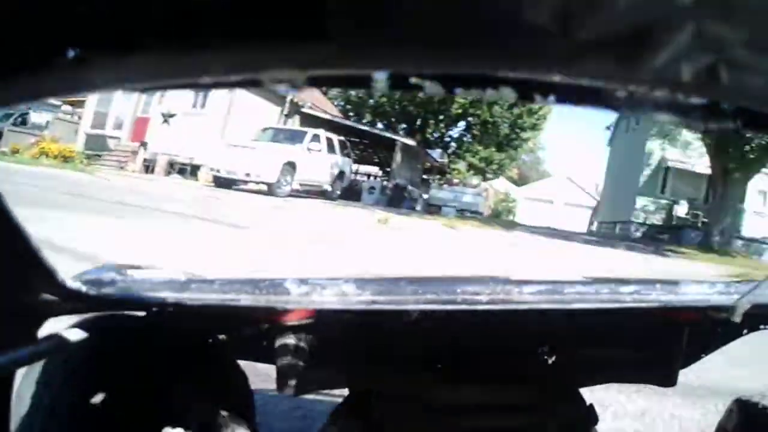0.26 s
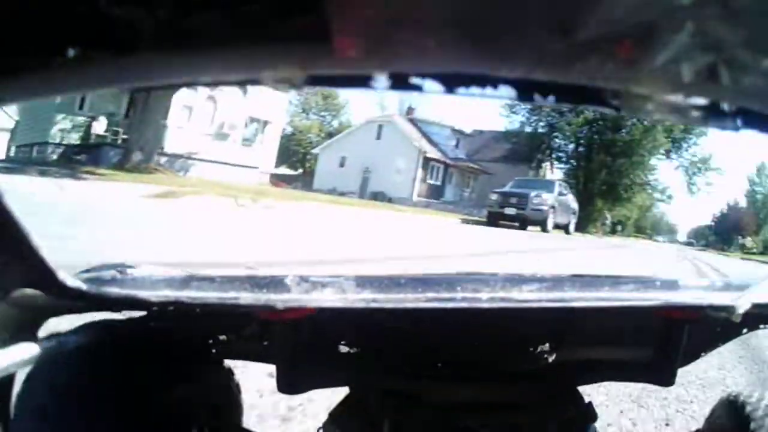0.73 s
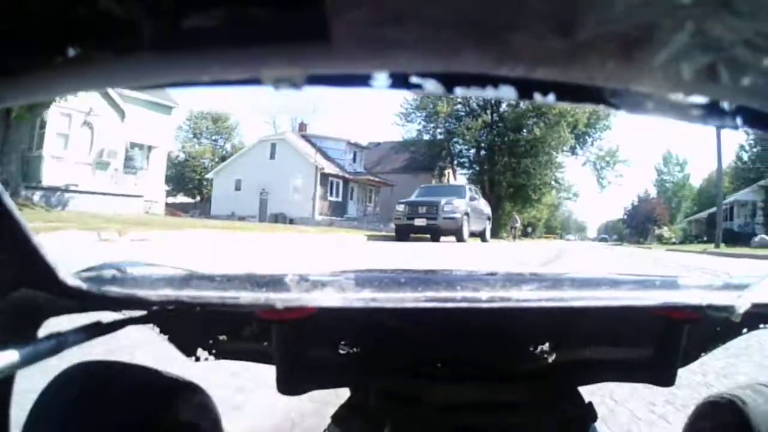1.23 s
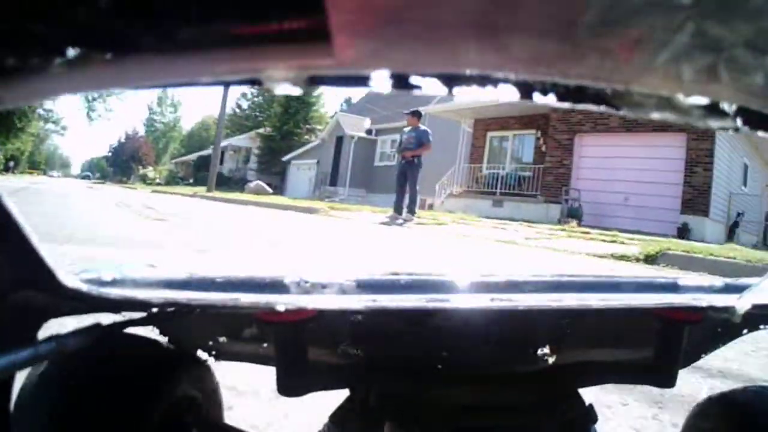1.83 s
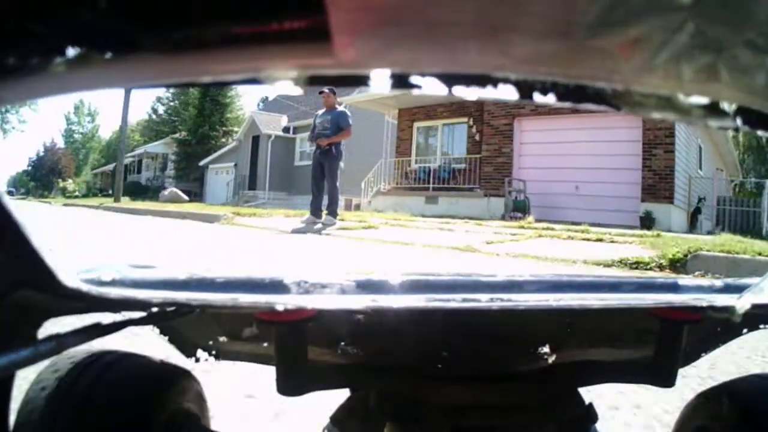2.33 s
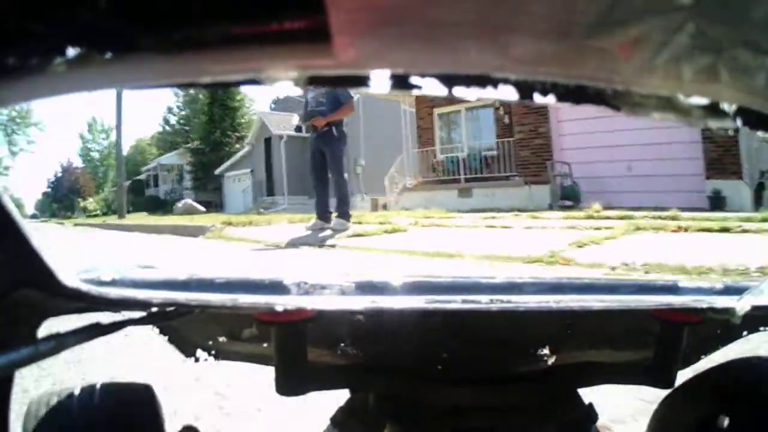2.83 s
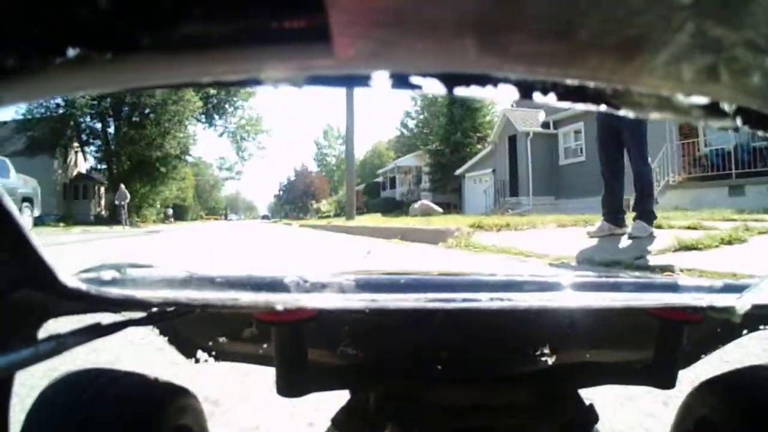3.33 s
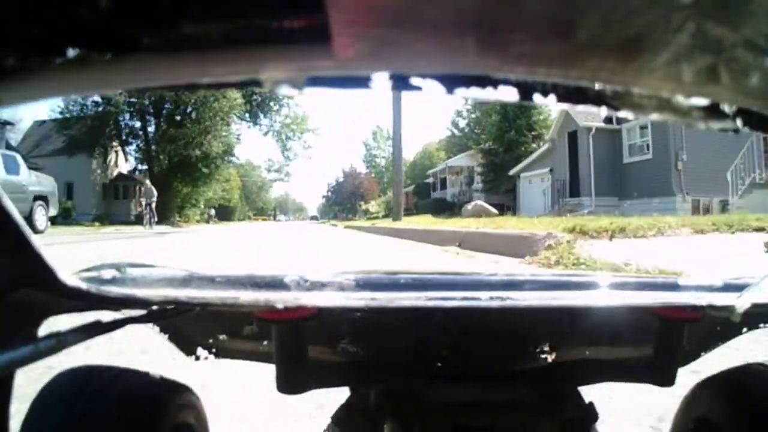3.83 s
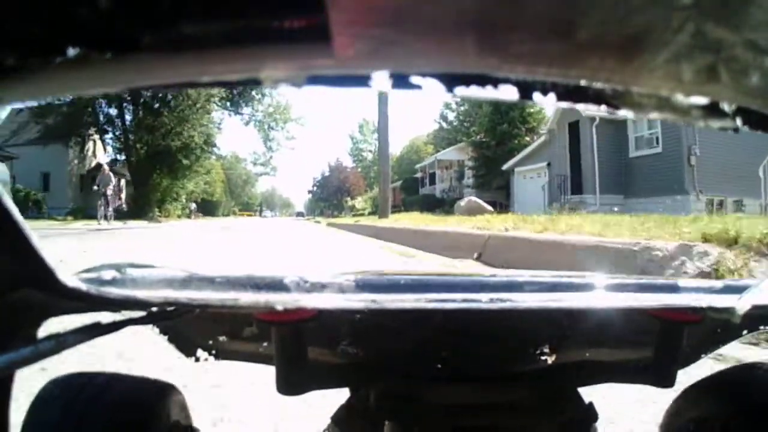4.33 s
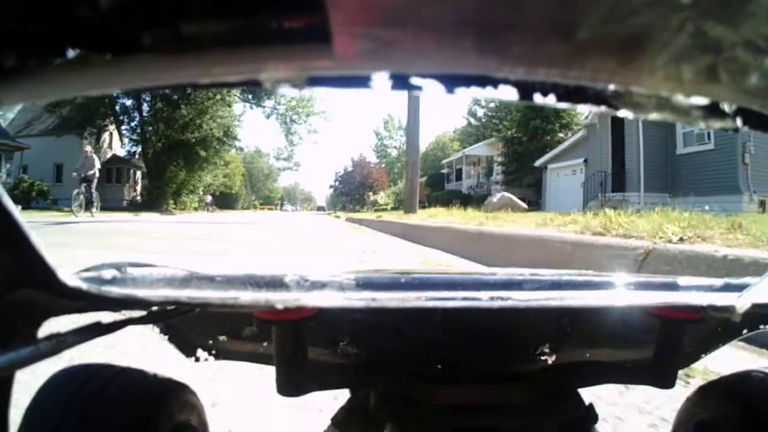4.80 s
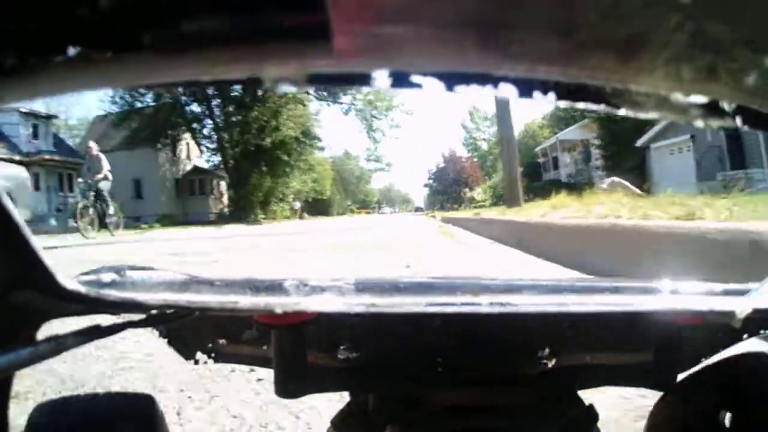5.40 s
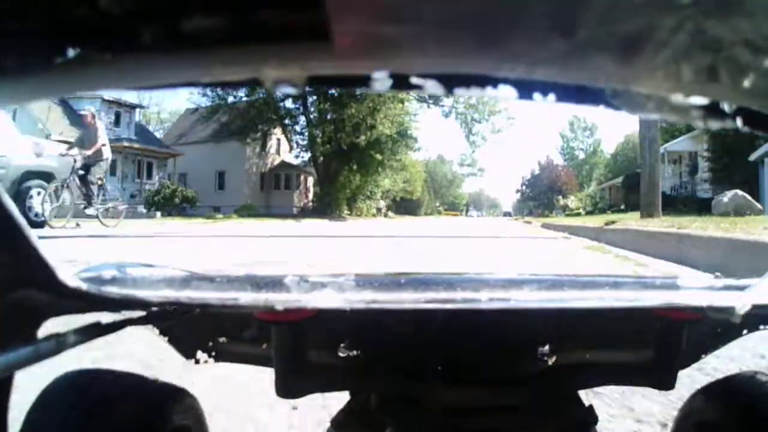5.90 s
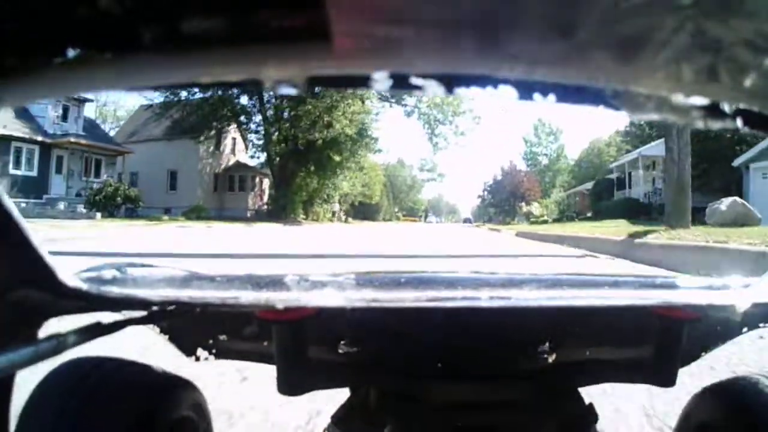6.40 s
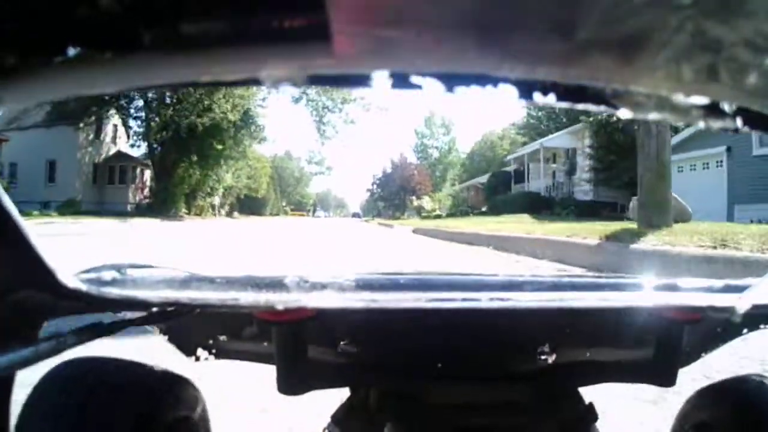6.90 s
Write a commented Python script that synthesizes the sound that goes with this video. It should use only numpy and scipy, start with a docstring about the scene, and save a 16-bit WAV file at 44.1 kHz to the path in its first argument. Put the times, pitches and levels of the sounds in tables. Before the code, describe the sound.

Heard from inside the plastic shell of a small electric model truck: gears grind and knocks rattle, then tyre lugs clatter rapidly in a sharp turn. The whine judders in and climbs fast, a second short rattle follows, the gears stutter off power, then settle into a steady gritty whine on the street, with a few bumps and faint squeaks.

```python
"""The gears of a small electric model truck, heard from a camera inside its plastic shell. The pinion whines on
a 54-tooth spur gear as a swept sine and its octave; noise shaped by the worn teeth repeats in part with every
turn, and the gearbox adds a lower, fuzzy moan. In sharp turns the tyre lugs rattle on the shell as ringing
modes and the floor pan hums; jolts from gear slack and from bumps in the street shake the loose shell above a
filtered-noise road rumble, with a few thin squeaks."""
import sys
import numpy as np
from scipy import signal
from scipy.fft import rfft, irfft
from scipy.io import wavfile

SR = 44100
rng = np.random.default_rng(int(sys.argv[2]) if len(sys.argv) > 2 else 0)


def transcribe(signal):
    """Save signal, clipped to [-1, 1], as a 16-bit WAV file at the path in sys.argv[1]."""
    frames = np.atleast_2d(signal).T
    limited = np.clip(frames, -1, 1)
    pcm = np.round(limited * 32767).astype(np.int16)
    wavfile.write(sys.argv[1], SR, pcm)


N = 315315

# ringing modes of the plastic shell: (f/Hz, width/Hz, relative level/dB)
SHELL_MODES = [(850, 67, -15.5), (961, 37, -13), (1458, 56, -11), (1850, 250, -2.5), (2447, 78, -5.5),
               (2900, 224, 2), (3166, 350, 2.5), (3850, 360, -4), (4670, 240, -11), (4920, 180, -12),
               (5510, 180, -16)]


def gain_of(db):
    """Decibels to a factor."""
    return 10 ** (np.asarray(db) / 20)


def evened(x):
    """Scales to rms 1."""
    return x / np.sqrt(np.mean(x ** 2) + 1e-20)


def curves(rows):
    """Every column of a table after its times, drawn as a line through the points."""
    s, *columns = np.transpose(rows)
    t = np.arange(N) / SR
    return [np.interp(t, s, column) for column in columns]


def coloured(x, points):
    """Imposes a spectrum, almost silent outside its ends, and scales to rms 1."""
    hz, db = np.transpose(points)
    f = np.fft.rfftfreq(N, 1 / SR)
    # straight lines in dB over log frequency
    spectrum_db = np.interp(np.log(f + 1), np.log(hz + 1), db, -90, -90)
    return evened(irfft(rfft(x) * gain_of(spectrum_db), N))


def ring(modes):
    """Impulse response of decaying modes of alternate sign, peak 1; wider modes die sooner."""
    t = np.arange(SR // 8) / SR
    out = np.zeros(len(t))
    for k, (hz, width, db) in enumerate(modes):
        decay = np.exp(-np.pi * width * t)
        out += (-1) ** k * gain_of(db) * decay * np.sin(2 * np.pi * hz * t)
    return out / abs(out).max()


def slow(hz):
    """Random wander of rms 1, up to about hz."""
    b, a = signal.butter(2, hz, fs=SR)
    return evened(signal.lfilter(b, a, rng.standard_normal(N)))


def add(mix, s, sound):
    """Mixes a sound in at s seconds."""
    part = mix[round(s * SR):][:len(sound)]
    part += sound[:len(part)]


def spell(start, end, edge_s):
    """A gate from 0 to 1 and back, with soft edges."""
    t = np.arange(N) / SR
    return np.clip(np.minimum(t - start, end - t) / edge_s, 0, 1)


def drive_line():
    """Meshing rate with the twist around each bump, torque, turns of the heavy spur gear, and shaking."""
    # speed of the drive line: (t/s, tooth meshing f/Hz, torque on the teeth as whine level/dB)
    speed = [(0.62, 731, -56), (0.65, 737, -19), (0.715, 810, -16.5), (0.74, 864, -28.5),
             (0.775, 878, -15.5), (0.8, 978, -25), (0.89, 1236, -19), (1.05, 1577, -23.5),
             (1.15, 1745, -20), (1.25, 1911, -24), (1.31, 1872, -20), (1.35, 1740, -32), (1.45, 1592, -40),
             (1.86, 1332, -44), (1.9, 1240, -38), (2.04, 1251, -28), (2.72, 1310, -29.5),
             (2.84, 1258, -26.5), (3.1, 1237, -27.5), (4.2, 1272, -28.5), (5.15, 1320, -26.5),
             (5.45, 1293, -26.5), (5.82, 1252, -27.5), (6.0, 1288, -28), (7.15, 1351, -25)]
    # a wheel takes a crack and the drive line rings in twist: (t/s of deepest sag, depth/Hz, dying time/s)
    bumps = [(2.781, 99.94, 0.11), (3.17, 35, .04), (5.283, 109, 0.16), (6.465, 40.06, .04)]
    teeth, twist_hz, twist_rise_s, full_bump_hz = 54, 16.07, 0.025, 100
    hz, torque_db = curves(speed)
    turns = np.cumsum(hz) / SR / teeth  # the heavy gear ignores the twist
    t = np.arange(N) / SR
    twist, shaken = np.zeros(N), np.zeros(N)
    for s, depth_hz, dying_s in bumps:
        shake = depth_hz * np.exp(-np.maximum((t - s) / dying_s, (s - t) / twist_rise_s))
        twist += shake * np.cos(2 * np.pi * twist_hz * (t - s))
        shaken += shake / full_bump_hz
    return hz - twist, torque_db, turns, shaken


def surging():
    """Rise in dB of the gear noise as the gears, off the throttle, knock through their slack."""
    # surges: (start t/s, length/s, rise/dB)
    surges = [(0.04, 0.045, 5.5), (1.487, 0.092, 6), (1.598, 0.057, 7.5), (1.664, .03, 4),
              (1.716, 0.033, 7), (1.793, 0.034, 9)]
    edge_s = 0.0027
    return sum(db * spell(s, s + length, edge_s) for s, length, db in surges)


def off_centre(turns):
    """The spur gear runs a little off centre: a swing from -1 to 1 once a turn."""
    return np.cos(2 * np.pi * (turns - 0.25))


def rubbing(column):
    """One dB column of the tyre rubs as gains and gates: hardest once, easing towards both ends."""
    # tyres rub: (start t/s, hardest t/s, end t/s, low pan mode level/dB, high pan mode level/dB,
    #             lug thud level/dB, rumble rise/dB); the levels hold at the hardest moment
    rubs = [(0.0, .1, 0.196, -27.5, -31, -40, -10), (0.21, .46, .7, -29.5, -24.5, -24, 18),
            (1.284, 1.452, 1.47, -45, -22.5, -32.5, -7)]
    start_db, end_db, edge_s = -4, -8, 0.0064  # easing at either end, length of the gate's edges
    t = np.arange(N) / SR
    spells = []
    for row in rubs:
        start, hardest, end = row[:3]
        easing_db = np.interp(t, [start, hardest, end], [start_db, 0, end_db])
        spells.append((gain_of(row[column] + easing_db), spell(start, end, edge_s)))
    return spells


def road():
    """Tyres rolling on rough asphalt, felt through the chassis: low noise that shifts with rubs and bumps."""
    # base level of the rumble: (t/s, level/dB)
    road_level = [(0.0, -45), (0.9, -48.5), (1.1, -45), (1.4, -43), (2.0, -47.5), (2.7, -43), (3.3, -45),
                  (4.3, -44), (5.8, -45), (7.15, -47)]
    # colour of the rumble: (f/Hz, relative level/dB)
    rumble_colour = [(12, -46.5), (20, -9), (54, -4.5), (177, -5.5), (206, -2.5), (236, -6.5), (297, 0.5),
                     (436, -9.5), (466, -15.5), (520, -9), (680, -32.5), (1140, -120)]
    bump_rise_db = 3  # at the deepest sag of a full bump
    rub = np.ones(N)
    for gain, gate in rubbing(column=6):
        rub *= gain ** gate  # the gate fades the change in dB
    _, _, _, shaken = drive_line()
    level_db = curves(road_level)[0] + bump_rise_db * shaken + 1.3 * slow(23.0)
    return rub * gain_of(level_db) * coloured(rng.standard_normal(N), rumble_colour)


def squeaks():
    """Brief thin tones, each swelling and fading while its pitch follows an arc."""
    # squeaks: (t/s, length/s, start f/Hz, middle f/Hz, end f/Hz, rms level at the fullest/dB)
    squeak_list = [(2.652, 0.099, 2900, 3287, 3050, -46), (2.965, 0.024, 3858, 3850, 3600, -33),
                   (5.19, 0.06, 3100, 3200, 2750, -50)]
    out = np.zeros(N)
    for s, length, start_hz, middle_hz, end_hz, db in squeak_list:
        u = np.linspace(0, 1, round(length * SR))
        arc = np.polyfit([0, 0.5, 1], [start_hz, middle_hz, end_hz], 2)
        phase = 2 * np.pi * np.cumsum(np.polyval(arc, u)) / SR
        add(out, s, gain_of(db) * np.sqrt(2) * np.sin(np.pi * u) * np.sin(phase))
    return out


def floor_pan(steady=0.27):
    """Rubbing noise keeps two modes of the floor pan humming, more evenly than chance alone."""
    # modes of the floor pan: (f/Hz, width/Hz)
    pan_modes = [(235, 8.1), (452, 28)]
    out = np.zeros(N)
    for (hz, width), spells in zip(pan_modes, [rubbing(column=3), rubbing(column=4)]):
        mode = ring([(hz, width, 0)])
        hum = evened(signal.fftconvolve(rng.standard_normal(N), mode)[:N])
        envelope = abs(signal.hilbert(hum))
        hum = evened(hum / (envelope + 0.2) ** steady)
        out += sum(gain * gate for gain, gate in spells) * hum
    return out


def jolts():
    """A jolt from the gears knocking through their slack, or from a bump, shakes the loose shell for a moment:
    a clump of tiny knocks rings its modes."""
    # jolts: (t/s, peak level/dB, dying time of the shaking/s)
    jolt_list = [(0.038, -15.5, 0.013), (0.103, -19, 0.022), (0.175, -32, 0.033), (1.489, -20, 0.016),
                 (1.53, -43, 0.03), (1.6262, -50, 0.03), (1.664, -32, 0.03), (1.7205, -34, 0.03),
                 (1.7985, -30, 0.017), (1.8421, -34, 0.034), (1.879, -39, 0.028), (2.802, -35, 0.026),
                 (2.98, -27, 0.02), (5.1755, -24, 0.024), (5.305, -32, 0.023), (5.4267, -28, 0.021)]
    out, shell = np.zeros(N), ring(SHELL_MODES)
    t = np.arange(4000) / SR
    for s, db, length in jolt_list:
        knocks = rng.standard_normal(len(t)) ** 3  # cubing leaves sparse, spiky knocks
        shake = signal.fftconvolve(knocks * np.exp(-(t / length) ** 2), shell)
        add(out, s, gain_of(db) * shake / abs(shake).max())
    return out


def lugs(scrape_s=0.0056, rise_s=0.0013, rebound_s=0.003, rebound=0.66):
    """Each rubber lug snaps past the wheel arch and rebounds, ringing the shell and thudding the chassis."""
    # lugs striking the shell: (t/s, strike level/dB)
    strikes = [(0.2092, -8.5), (0.22, -6.5), (0.231, -11), (0.2525, -8.5), (0.2611, -2.5), (0.274, -3),
               (0.2933, -7), (0.311, -6), (0.3245, -7.5), (0.3418, -1), (0.3565, -1.5), (0.3719, -3),
               (0.389, -4.5), (0.4048, -3.5), (0.4207, 0), (0.4378, 1), (0.4569, 1), (0.4746, 2),
               (0.4935, -0.3), (0.511, -6), (0.5237, -6), (0.542, -12), (0.5586, -5), (0.5724, -7),
               (0.5871, -6.5), (0.6014, -15), (0.618, -14.5), (0.634, -10.5), (0.65, -6.5), (1.3014, -0.5),
               (1.3146, -5), (1.3323, -16), (1.3517, -3.5), (1.3646, -4), (1.3802, -13), (1.3965, -3.5),
               (1.4115, -4.5), (1.4289, -5)]
    # modes of the chassis thud: (f/Hz, width/Hz, relative level/dB)
    thud_modes = [(59, 30, -16.5), (120, 100, -23.5), (171, 14, 4)]
    gritty, thud_spread_db = 0.06, 1  # scraping against the snap, scatter of the thuds
    out, shell = np.zeros(N), ring(SHELL_MODES)
    t = np.arange(600) / SR
    soft_push = np.hanning(SR // 200) * 400 / SR  # rubber gives way for 5 ms
    thud = signal.fftconvolve(ring(thud_modes), soft_push)
    snap = (t == 0) + rebound * (np.arange(len(t)) == round(rebound_s * SR))
    push = sum(gain * gate for gain, gate in rubbing(column=5))
    for s, db in strikes:
        scrape = gritty * rng.standard_normal(len(t)) * np.exp(-t / scrape_s)
        hit = signal.fftconvolve(snap + scrape, shell)
        hit *= 1 - np.exp(-np.arange(len(hit)) / SR / rise_s)  # softens the attack
        add(out, s, gain_of(db) * hit)
        scatter = gain_of(thud_spread_db * rng.standard_normal())
        add(out, s, push[round(s * SR)] * scatter * thud)
    return out


def moan(blur=0.02, surge_share=0.55):
    """Lower gearbox moan while braking, pulling away and coasting: a trembling sine, throbbing each turn."""
    # moan: (t/s, f/Hz, rms level before the throb and surges/dB)
    moan_path = [(0.0, 770, -29), (0.16, 770, -35), (0.3, 790, -32), (0.36, 790, -61), (0.8, 720, -65.5),
                 (0.87, 720, -35), (1.0, 750, -25), (1.14, 815, -22.5), (1.33, 820, -25.5),
                 (1.44, 790, -32), (1.47, 745, -33.5), (1.7, 695, -36), (1.85, 730, -44), (1.9, 730, -64)]
    throb_depth_db, loudest_at = 6.5, 0.41  # swing either way, place in the turn
    hz, db = curves(moan_path)
    _, _, turns, _ = drive_line()
    throb_db = throb_depth_db * np.cos(2 * np.pi * (turns - loudest_at))
    phase = 2 * np.pi * np.cumsum(hz * (1 + blur * slow(84.0))) / SR
    return np.sqrt(2) * gain_of(db + throb_db + surge_share * surging()) * np.sin(phase)


def gear_noise(repeat=0.88, knock=0.073, patchy_db=0.25):
    """Tooth noise from random chatter and flaws that repeat each turn, knocking at the worn places."""
    # noise of the gear train: (t/s, grind level/dB, drone against grind before a fixed cut/dB,
    #                           fizz against grind/dB)
    load = [(0.0, -25, 2, -11.5), (0.1, -26, -1.5, -12), (0.2, -28.5, 6.5, -8.5), (0.3, -30, 5.5, -10),
            (0.52, -28, 1.5, -15), (0.61, -36.5, 9.5, -11), (0.67, -28.5, -4.5, -13), (0.87, -24, 0, -18.5),
            (1.02, -22.5, 1.5, -16.5), (1.25, -23, 5.5, -12.5), (1.44, -20.5, 0.5, -16.5),
            (1.46, -29, -0.5, -15), (1.6, -33.5, 3, -14), (1.84, -33, 1, -12), (1.86, -26.5, -2, -13),
            (2.05, -26.5, 1, -12.5), (2.85, -26, 1.5, -12), (3.3, -26, 1, -12), (7.15, -26, 2, -12.5)]
    # orders of the spur gear turn that stand out: (multiple of the turn, level against the chatter/dB)
    order_lines = [(25, -30), (26, -21), (27, -21), (30, -30), (31, -24), (32, -25), (33, -28), (34, -22),
                   (35, -24), (36, -25), (37, -30), (39, -17), (48, -27), (51, -25), (52, -25), (55, -27)]
    # worn places on the spur gear: (share of the turn, knock rise/dB)
    worn_places = [(0.023, 4.5), (0.17, 3), (0.45, 8.5), (0.699, 0)]
    # colours of the gear train in the shell, low to high: (f/Hz, relative level/dB)
    drone_colour = [(220, -39), (380, -13.5), (550, -14.5), (623, -6.5), (680, -5.5), (721, -6),
                    (813, -4.5), (857, -7), (933, -12.5), (993, -19.5), (1100, -43), (1430, -41.5),
                    (2420, -120)]
    grind_colour = [(620, -43.5), (1050, -14.5), (1200, -8), (1400, -7.5), (1580, -4), (1750, -10),
                    (1960, -12), (2110, -16.5), (2280, -11), (2520, -15.5), (2690, -18.5), (3400, -33),
                    (4420, -60), (7480, -120)]
    fizz_colour = [(1880, -50.5), (3200, -36), (3520, -10), (3920, 2.5), (4290, 7.5), (4720, 1.5),
                   (5090, -5), (5700, -15), (7410, -65), (12500, -120)]
    _, _, turns, _ = drive_line()
    grind_db, drone_db, fizz_db = curves(load)

    # each worn place gives a knock that dies within a small share of the turn
    knock_db = sum(db * np.exp(-((turns - at) % 1) / knock) for at, db in worn_places)
    knocks = gain_of(knock_db + patchy_db * slow(64.0))
    # one random surface around the gear, read again every turn
    flaws = np.interp(turns % 1 * 512, np.arange(513), rng.standard_normal(513))
    chatter = rng.standard_normal(N)
    lines = np.zeros(N)
    for order, db in order_lines:
        phase = 2 * np.pi * (order * turns + rng.random())
        lines += gain_of(db + 0.5 * slow(18.0)) * np.sin(phase)

    teeth = evened((chatter + repeat * evened(flaws)) * knocks)
    drone = coloured(evened(chatter * np.sqrt(knocks)) + lines, drone_colour)
    grind = coloured(teeth + lines, grind_colour)
    fizz = coloured(teeth * gain_of(0.82 * off_centre(turns)), fizz_colour)
    blend = gain_of(drone_db - 1.5) * drone + grind + gain_of(fizz_db) * fizz
    return gain_of(grind_db + surging()) * blend


def passed_db(hz):
    """Level of a pure tone through the shell at each pitch."""
    # passage through the shell: (f/Hz, level/dB)
    passes = [(700, 9.5), (800, 8.5), (980, -1.5), (1240, 2), (1320, -4.5), (1490, -4), (1590, 5.5),
              (1900, 1.5), (2250, 11), (2400, 12.5), (2490, 8.5), (2620, -7), (2780, 6), (3000, -1.5),
              (3200, -9), (3500, -25)]
    return np.interp(hz, *np.transpose(passes))


def gear_whine():
    """Whine at the tooth meshing rate and its octave, uneven in pitch and level, more so under strain."""
    wobble, flutter_db = 0.002, 1.3  # rms unevenness in pitch (share) and level
    strain_wobble, strain_flutter_db = 0.011, 2.5  # pitch stumble (share) and extra flutter at full strain
    # the gears judder as the throttle takes up the slack
    judder_s, judder_hz, judder_db, judder_fade_s = 0.665, 39.5, 9, 0.09  # dips to twice judder_db
    off_centre_db, off_centre_hz = 2.5, 1940  # throb once a turn: its depth at this meshing rate
    octave_db = -16.5
    hz, torque_db, turns, _ = drive_line()

    strain = np.clip((torque_db + 29) / 4, 0, 1)  # from -29 dB, full at -25 dB of torque
    once_a_turn = np.sin(2 * np.pi * (turns - 0.3))
    stumble = strain_wobble * strain * (once_a_turn + 0.67 * slow(36.0))
    meshes = np.cumsum(hz * (1 + wobble * slow(25.0) + stumble)) / SR

    since = np.arange(N) / SR - judder_s
    judder = judder_db * (np.cos(2 * np.pi * judder_hz * since) - 1) * np.exp(-(since / judder_fade_s) ** 2)
    throb = off_centre_db * off_centre(turns) * (hz / off_centre_hz) ** 3  # grows with speed
    level_db = torque_db + strain_flutter_db * strain * slow(53.0) + judder + throb

    tone_db = passed_db(hz) + level_db + flutter_db * slow(82.0)
    upper_db = passed_db(2 * hz) + octave_db + level_db + flutter_db * slow(33.0)
    tone = np.sin(2 * np.pi * meshes) * gain_of(tone_db)
    octave = np.sin(4 * np.pi * meshes) * gain_of(upper_db)
    return np.sqrt(2) * (tone + octave)


def scene():
    """Everything reaches one microphone inside the shell."""
    background = road() + squeaks() + floor_pan()
    knocks = jolts() + lugs()
    gearbox = moan() + gear_noise() + gear_whine()
    return (background + knocks + gearbox)[None]


def record(dry, dull_hz=5720.0):
    """The small camera saturates on the loudest knocks, dulls the top and cuts it off steeply."""
    full, edge_hz = 0.8, 6300  # level where the input saturates, upper edge in Hz
    held = dry / (1 + (dry / full) ** 4) ** 0.25
    dulled = signal.sosfilt(signal.butter(4, dull_hz, fs=SR, output="sos"), held)
    steep = signal.firwin(511, edge_hz, window=("kaiser", 9), fs=SR)
    return signal.oaconvolve(dulled, steep[None], "same")


dry = scene()
out = record(dry)
transcribe(out)
```